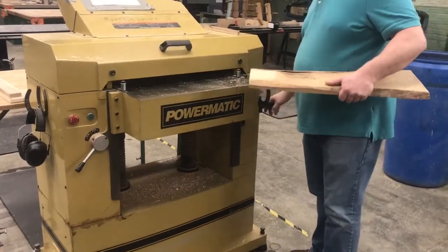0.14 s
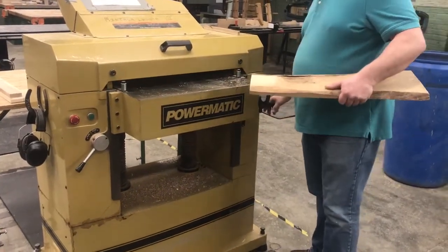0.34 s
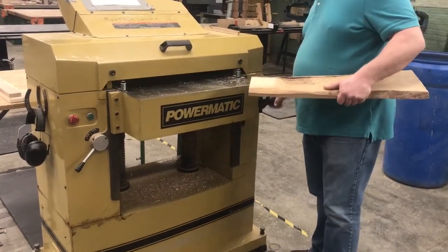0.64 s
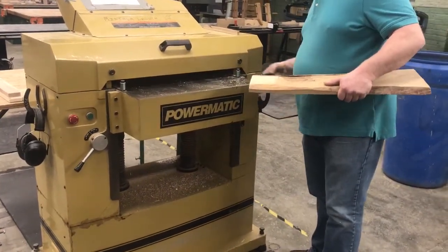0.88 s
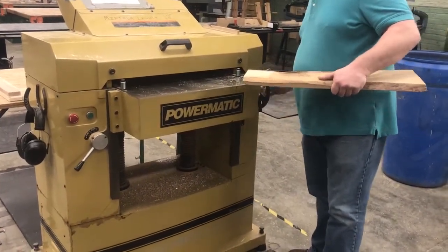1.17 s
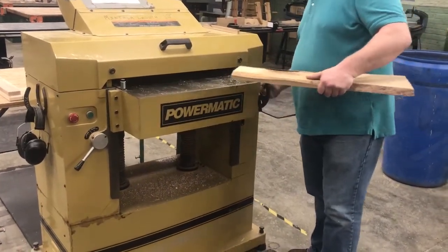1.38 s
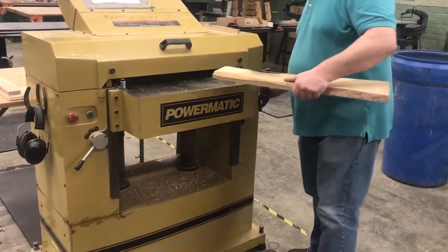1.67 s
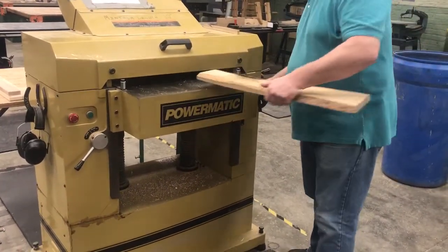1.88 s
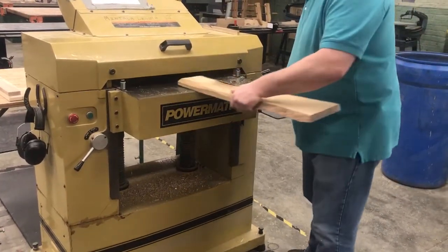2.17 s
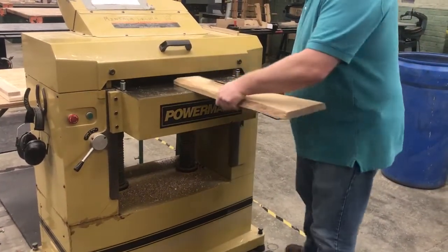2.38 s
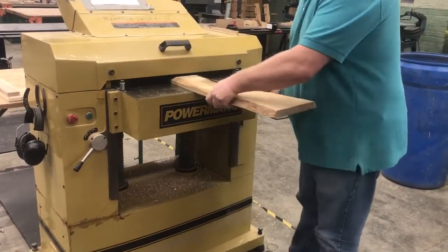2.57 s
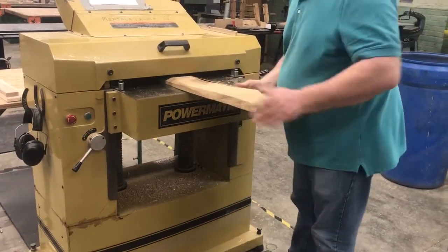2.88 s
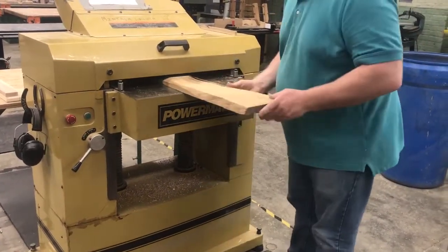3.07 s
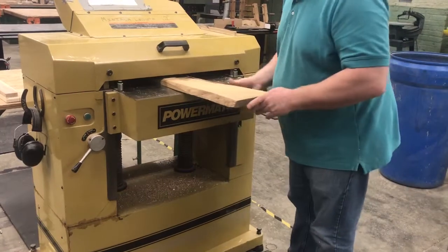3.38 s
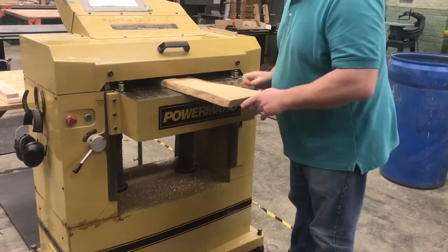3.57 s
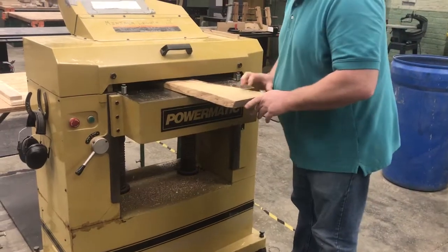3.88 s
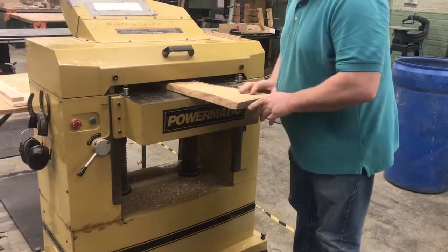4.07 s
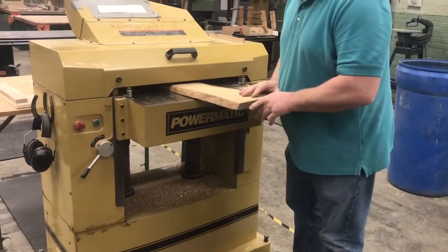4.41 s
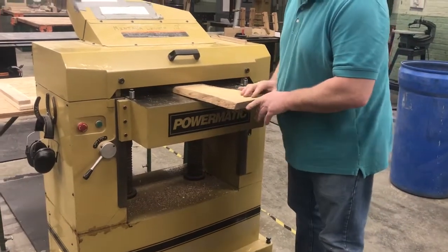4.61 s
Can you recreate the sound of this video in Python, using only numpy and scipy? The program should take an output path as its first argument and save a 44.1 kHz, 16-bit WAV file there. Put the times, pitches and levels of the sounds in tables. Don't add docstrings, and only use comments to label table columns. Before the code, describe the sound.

From 0 s a heavy thickness planer is already running at full speed in a hard concrete shop, heard close on a small microphone. A loud, steady whine near 320 Hz dominates, with weaker overtones, a second harmonic throbbing about 17 times a second, a gear tone near 540 Hz and faint slowly beating motor hum. Under it lies a broad airy roar with thin bearing whistle. A loose feed chain rattles about twelve times a second, some links clanking harder, notably near 1.8, 2.4, 2.6 and 4 s. Tiny metal pings come around 1.35 s, a barely audible dust hiss near 1.6 s. The tone colour shifts subtly as the worker moves the board. A high ping at 4.56 s precedes the bite at 4.57 s: sharp rapid knife strokes on ringing wood merge within hundredths of a second into a loud, buzzing, tearing scream; the pitch sags slightly, the machine ducks, and it ends mid-cut.

```python
import sys
import numpy as np
from scipy import signal
from scipy.fft import rfft, irfft, next_fast_len
from scipy.io import wavfile
from scipy.ndimage import uniform_filter1d, map_coordinates

SR = 44100
rng = np.random.default_rng(int(sys.argv[2]) if len(sys.argv) > 2 else 0)


def output_pcm(signal):
    pcm = np.clip(np.atleast_2d(signal).T, -1, 1) * 32767
    wavfile.write(sys.argv[1], SR, np.round(pcm).astype(np.int16))


def decibels_to_gain(level_db):
    exponent = np.asarray(level_db, float) / 20
    return 10 ** exponent


N = 209386
TIME = np.arange(N) / SR

CHAIN_HZ = 12.1555
BITE_S = 4.5725
APART_S = 0.01

# (time [s], board covers the mouth [0 to 1], leans [-1 in to 1 back])
BOARD = [
    (0, 0.03, 0.24),
    (1.5, 0.12, -0.2),
    (2.1, 0.3, -1.2),
    (2.45, 0.5, -.5),
    (2.9, .9, .8),
    (3.2, 1, 0.77),
    (3.6, 0.9, -0.3),
    (4.55, 1.1, 0.42),
]


def unit(x):
    return x / np.sqrt(np.mean(x ** 2) + 1e-20)


def curves(rows):
    s, *cols = np.transpose(rows)
    return [np.interp(TIME, s, c) for c in cols]


def wobble(rate):
    steps = np.arange(0, N + 16, 16)
    knots = rng.standard_normal(int(N * rate / SR) + 4)
    return np.interp(np.arange(N), steps, map_coordinates(knots, [steps * rate / SR]))


def settled(start_s, time_s):
    return 1 - np.exp(-np.maximum(TIME - start_s, 0) / time_s)


def filtered(x, response):
    m = next_fast_len(N + 8192)
    return irfft(rfft(x, m) * response(np.fft.rfftfreq(m, 1 / SR)), m)[:N]


def resonant(x, modes):
    def response(f):
        total = 0
        for k, (hz, width, db) in enumerate(modes):
            total = total + (-1) ** k * decibels_to_gain(db) * 1j * f * width / (hz * hz - f * f + 1j * f * width)
        return total
    return filtered(x, response)


def hiss(spectrum, patchy_db):
    z = signal.stft(rng.standard_normal(N + 512), nperseg=512)[2]
    patches = uniform_filter1d(rng.standard_normal(z.shape), size=6, axis=0)
    patches = uniform_filter1d(patches, size=10, axis=1)
    white = signal.istft(z * decibels_to_gain(patchy_db * unit(patches)), nperseg=512)[1][:N]
    f, db = np.transpose(spectrum)
    return unit(filtered(white, lambda hz: decibels_to_gain(np.interp(np.log(hz + 1), np.log(f + 1), db))))


def tone(turns, db):
    return np.sqrt(2) * decibels_to_gain(db) * np.cos(2 * np.pi * turns)


def head_strokes():
    return 0.48 + np.cumsum(320.87 - 1.4 * settled(4.635, 0.04)) / SR


def whine(strokes):
    # (level [dB], gain under the board [dB], gain by leaning [dB], unsteadiness [dB])
    orders_db = [(-17.5, 0, 0, 0.11), (-30, 0, 1.5, 1), (-39, 4, 0, 0.1), (-43.5, -1.5, 2, 1.2),
                 (-50.5, 3, 3, 1.4), (-67, 10, -2, 4.5), (-63, 0, -1.5, 4), (-58, -3, -1, 2),
                 (-56.5, -9, -1, 3)]
    cover, lean = curves(BOARD)
    orders = []
    for k, (db, cover_db, lean_db, sway_db) in enumerate(orders_db):
        sway = sway_db * wobble(25 if k < 5 else 6)
        level_db = db + cover_db * cover + lean_db * lean + sway
        orders.append(tone((k + 1) * strokes - 0.076 * k * k, level_db))
    pulley_turns = 17.055 * TIME + 0.2 + 0.14 * lean
    throb_db = 4.4 + 1.2 * lean - 1.5 * cover + 0.4 * wobble(14)
    orders[1] = orders[1] * unit(decibels_to_gain(throb_db * np.cos(2 * np.pi * pulley_turns)))
    return sum(orders)


def drive():
    # (frequency [Hz], level [dB], unsteadiness [dB])
    gear_tones = [(537.4, -36.5, 1), (548.6, -53.5, -0.5), (290.5, -48.5, 4.5), (1070, -59.5, 1.5),
                  (1172, -58.5, 6), (1614, -58, 1), (61.3, -57.5, 1.5), (117.6, -55.5, -2), (184, -59, 2)]
    # (multiple of the link rate [1], level [dB])
    chain_knock = [(7, -54), (8, -56), (11, -51), (13, -57), (14, -48), (15, -55), (16, -55), (19, -56),
                   (20, -56), (22, -57), (27, -59), (32, -57),
                   (45, -54), (52, -55), (56, -58), (59, -56), (60, -57), (61, -58), (62, -54), (63, -53),
                  (66, -60), (69, -57), (72, -61), (73, -58)]
    gears = sum(tone(hz * TIME + rng.random(), db + sway_db * wobble(9.4)) for hz, db, sway_db in gear_tones)
    chain = sum(tone(k * CHAIN_HZ * TIME + rng.random(), db + 1.5 * wobble(3.7))
                for k, db in chain_knock)
    beat = np.cos(np.pi * 1.1 * (TIME - 0.38))
    return gears + chain + beat * tone(60.24 * TIME, -48 + 0.8 * wobble(5.7))


def roar():
    # (frequency [Hz], density [dB per Hz])
    low_roar = [(20, -28), (44, -23), (70, -8), (140, -9), (185, -8), (230, -8), (385, -1.5), (430, -10.5),
                (620, -3), (800, -4.5), (880, -9.5), (1180, -10), (1400, -19.5), (1900, -49.5)]
    # (frequency [Hz], density [dB per Hz])
    high_roar = [(820, -22.5), (1500, -5), (1800, -8.5), (2250, -9.5), (2850, -8), (3300, -11.5),
                 (4410, -13), (4830, -18.5), (5300, -15.5), (6700, -15), (8500, -19.5), (10500, -27.5),
                 (13300, -32.5), (15600, -43)]
    # (frequency [Hz], width [Hz], level [dB])
    bearings = [(5250, 70, -0.5), (5570, 70, -2.5), (6680, 90, -1), (13300, 250, -15.5)]
    cover = curves(BOARD)[0]
    body = decibels_to_gain(-35 + 0.54 * wobble(8.2)) * hiss(low_roar, patchy_db=1.17)
    whistle = decibels_to_gain(-60) * unit(resonant(rng.standard_normal(N), bearings))
    air = decibels_to_gain(-42.5 + 0.8 * cover + 0.5 * wobble(12)) * hiss(high_roar, patchy_db=0.4)
    return body + whistle + air


def clanks():
    loose = [21, 29, 31, 48]
    slack = [1, 14, 16, 17, 33, 39, 40, 42, 44, 51, 53]
    rebounds = [5.27, 31.78, 42.83, 44.77, 45.77, 46.8, 50.24, 53.8]
    # (frequency [Hz], width [Hz], level [dB])
    link_ring = [(3180, 390, -11.5), (5300, 340, 0), (5800, 460, -2), (6730, 420, -2.5),
                 (8500, 1500, -15.5)]
    links = [(k, -30.5 if k in loose else -34.5 if k in slack else -39.5) for k in range(57)]
    links += [(k, -36) for k in rebounds]
    t = np.arange(SR // 20) / SR
    blows = np.zeros(N + SR)
    for k, db in links:
        start = round((0.028 + k / CHAIN_HZ) * SR)
        envelope = decibels_to_gain(db + rng.normal(0, 1) - 60 * t / 0.071) * (1 - np.exp(-t / 0.0017))
        blows[start:][:len(t)] += envelope * rng.standard_normal(len(t))
    return decibels_to_gain(7) * resonant(blows[:N], link_ring)


def chip_pings():
    # (time [s], frequency [Hz], peak level [dB])
    chips = [
        (1.332, 3300, -38),
        (1.375, 5030, -36),
        (1.381, 4600, -38),
        (4.557, 7000, -34),
    ]
    t = np.arange(SR // 20) / SR
    pings = np.zeros(N + SR)
    for s, hz, db in chips:
        envelope = decibels_to_gain(db - 60 * t / 0.041) * (1 - np.exp(-t / 0.002))
        pings[round(s * SR):][:len(t)] += envelope * np.sin(2 * np.pi * hz * t)
    return pings[:N]


def dust_puff():
    swell = np.exp(-((TIME - 1.57) / 0.025) ** 2)
    high = filtered(rng.standard_normal(N), lambda hz: 1 / (1 + (12500 / (hz + 1)) ** 10))
    return decibels_to_gain(-66) * swell * unit(high)


def edge_strikes(contact, force):
    knife_db = [-1, 1.5, -5, -4.5]
    # (frequency [Hz], width [Hz], level [dB])
    edge_ring = [(2620, 350, -3.5), (4000, 530, -2), (5160, 360, -2.5), (6250, 650, -5.5), (7300, 370, -1),
                 (8100, 340, -7.5), (9500, 1100, -14.5), (12000, 2000, -23.5)]
    knife = np.floor(contact).astype(int)
    hits = np.diff(knife, prepend=0) * decibels_to_gain(np.take(knife_db, knife % 4) + 1.5 * wobble(300))
    t = np.arange(SR // 30) / SR
    decay = decibels_to_gain(-60 * t / 0.0051) + decibels_to_gain(-21.5 - 60 * t / 0.031)
    scrape = rfft(decay * rng.standard_normal(len(t)))
    colour = np.sqrt(uniform_filter1d(np.abs(scrape) ** 2, size=9))
    scrape = irfft(scrape / colour, len(t))
    return resonant(signal.fftconvolve(hits * decibels_to_gain(34.5) * force, scrape)[:N], edge_ring)


def board_song(strokes):
    # (multiple of the knife rate [1], level on the edge [dB], level on the face [dB])
    whole = [(2, -16, 0), (3, -2, -18.5), (4, -4, -31.5), (5, -7, -4), (6, -5, 1.5), (7, -5, -18),
             (8, -2.5, -11.5), (9, -7, -10.5), (10, -17, -10.5), (11, -18, -15), (12, -5, -27.5),
             (13, -8, -28), (14, -12, -26.5), (25, -21.5, -17.5)]
    # (multiple of the knife rate [1], level on the edge [dB], level on the face [dB])
    half = [(2.5, -19, -16.5), (3.5, -9.5, -3.5), (4.5, -20, -22.5), (5.5, -21.5, -27.5), (6.5, -18, -22),
            (7.5, -20.5, -18), (8.5, -7.5, -15), (9.5, -18.5, -19), (11.5, -13, -26), (12.5, -11, -21.5),
            (13.5, -18.5, -14.5)]
    on_face = 0.5 + 0.5 * np.tanh((TIME - 4.648) / (2 * 0.015))
    chatter_db = 3.5 * np.cos(2 * np.pi * 24 * (TIME - 4.685))
    song = np.zeros(N)
    for k, edge_db, face_db in whole + half:
        change_db = face_db - edge_db - 1.5 + chatter_db * 4 / k ** 2
        level_db = edge_db - 19 + on_face * change_db + 1.7 * wobble(60)
        song += tone(k * strokes + rng.random(), level_db)
    return song


def tearing(contact, apart):
    # (frequency [Hz], density [dB per Hz])
    tear_edge = [(60, -28.5), (400, -21), (900, -16), (1500, -9), (2600, -8), (4000, -8), (5000, -9),
                 (7200, -8), (9000, -14.5), (12000, -26), (15600, -37)]
    # (frequency [Hz], density [dB per Hz])
    tear_face = [(60, -26), (400, -20), (700, -9.5), (1200, -6.5), (1800, -6), (2500, -14), (3500, -5.5),
                 (4800, -13.5), (6500, -12.5), (7600, -22), (8050, -12.5), (9000, -25), (12000, -34),
                 (15600, -45)]
    dull = settled(BITE_S + 2 * APART_S, 0.05)
    tear = np.sqrt(1 - dull) * hiss(tear_edge, patchy_db=0.5) + np.sqrt(dull) * hiss(tear_face, patchy_db=0.8)
    burst = unit(np.exp(-3 * (contact % 1)))
    return ((1 - apart) + apart * burst) * tear


def cut(strokes):
    contact = strokes + 0.7
    growth = (TIME > BITE_S) * settled(BITE_S, 0.012)
    level = growth * decibels_to_gain(-11.5 + 0.6 * wobble(30))
    apart = 1 - 0.9 * settled(BITE_S + APART_S, 0.022)
    swell = 1 - 0.78 * apart
    song = decibels_to_gain(15) * swell * board_song(strokes)
    tear = decibels_to_gain(-5) * tearing(contact, apart)
    return edge_strikes(contact, level * apart) + level * (song + tear)


def scene():
    strokes = head_strokes()
    machine = whine(strokes) + drive() + roar() + clanks() + chip_pings()
    duck = decibels_to_gain(-5 * settled(4.59, 0.03))
    return (duck * machine + dust_puff() + cut(strokes))[None]


def low_pass(x):
    return signal.sosfilt(signal.butter(12, 15700, fs=SR, output="sos"), x)


def record(dry):
    # (frequency [Hz], width [Hz], level [dB])
    dips = [(1027, 90, -1.5), (7600, 200, -2.5), (10600, 230, -3), (12400, 150, -2)]
    x = filtered(dry[0], lambda hz: decibels_to_gain(sum(db * np.exp(-((hz - c) / w) ** 2) for c, w, db in dips)))
    x = x / (1 + np.abs(x / 0.74) ** 6) ** (1 / 6)
    x = filtered(x, lambda hz: hz < 15750)[None]
    return low_pass(x)


dry = scene()
out = record(dry)
output_pcm(out)
```